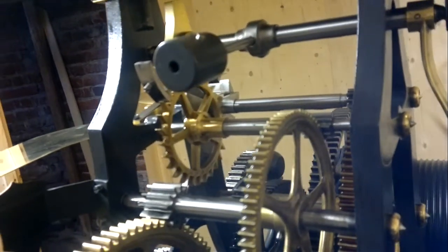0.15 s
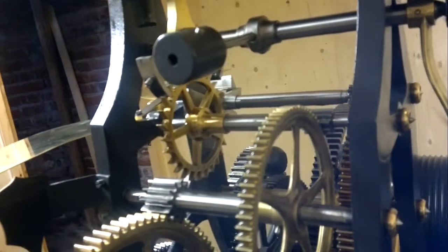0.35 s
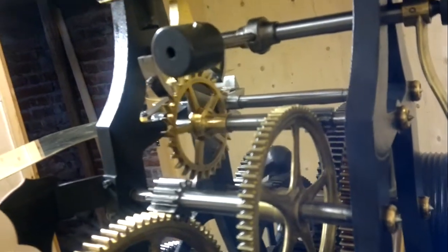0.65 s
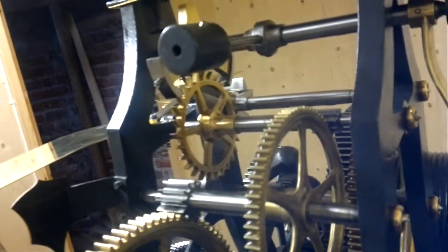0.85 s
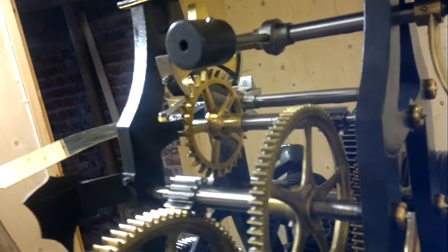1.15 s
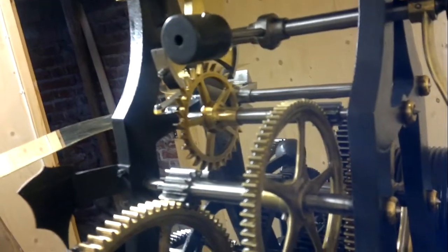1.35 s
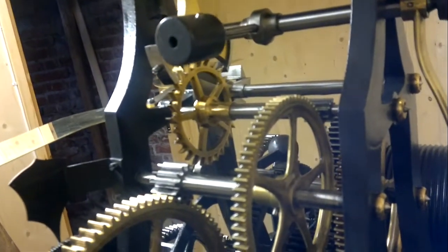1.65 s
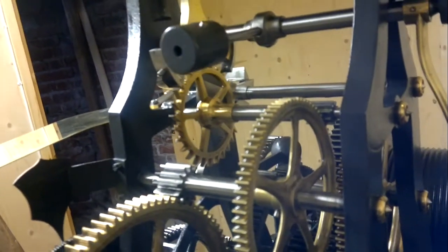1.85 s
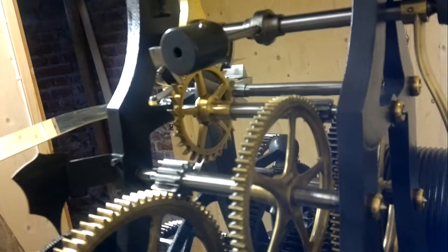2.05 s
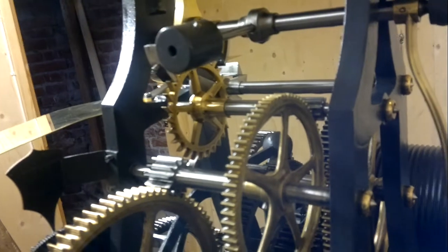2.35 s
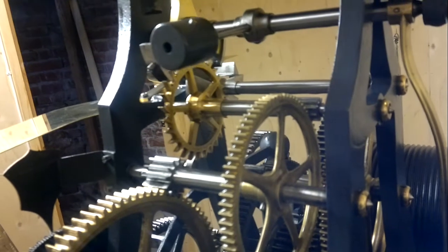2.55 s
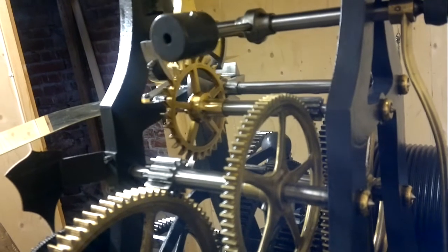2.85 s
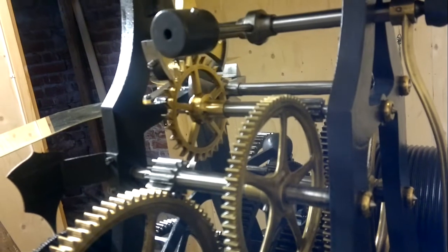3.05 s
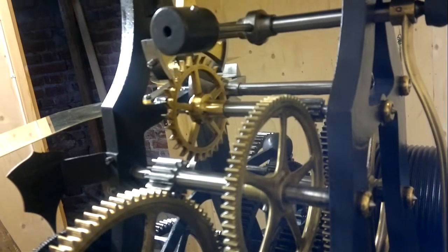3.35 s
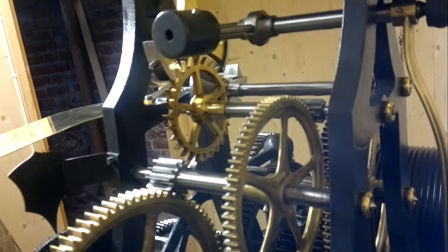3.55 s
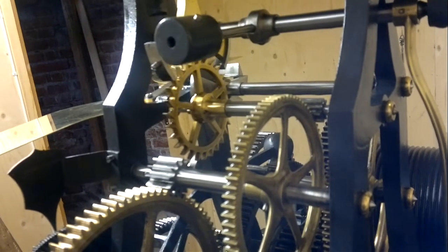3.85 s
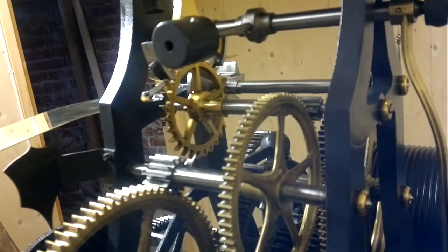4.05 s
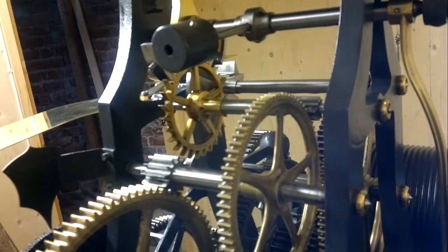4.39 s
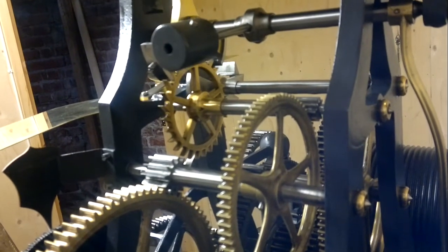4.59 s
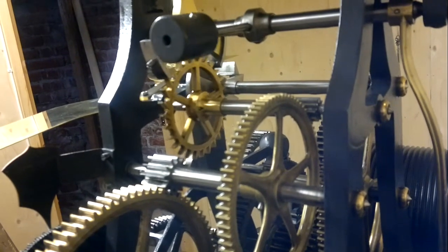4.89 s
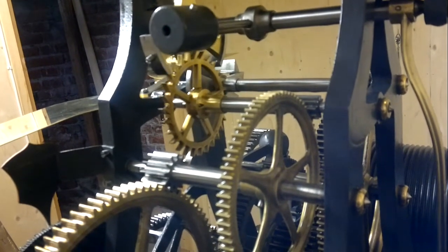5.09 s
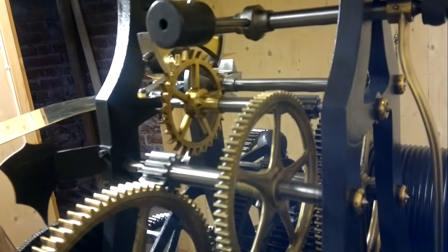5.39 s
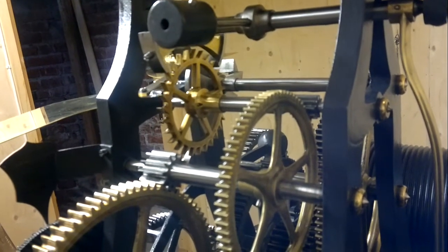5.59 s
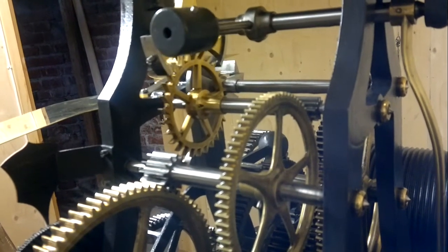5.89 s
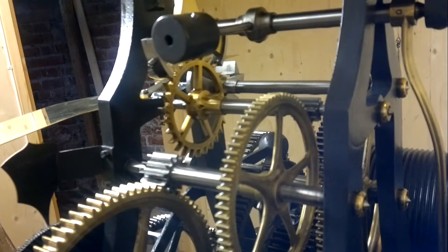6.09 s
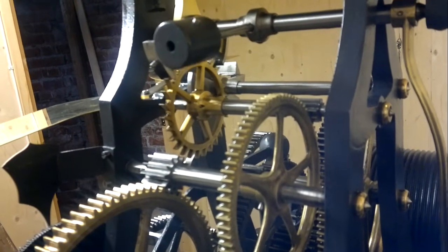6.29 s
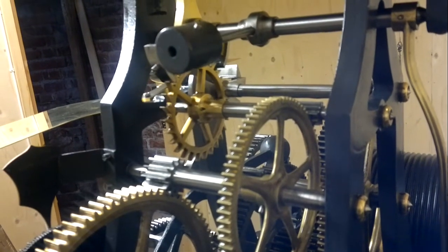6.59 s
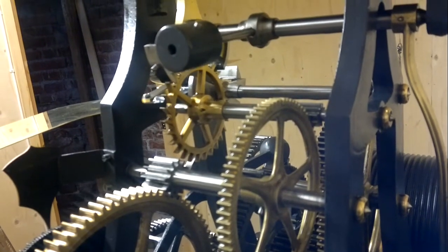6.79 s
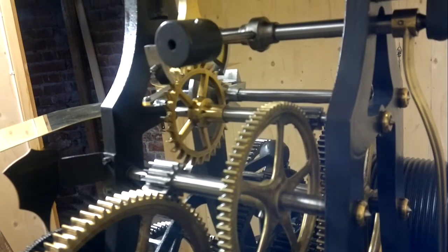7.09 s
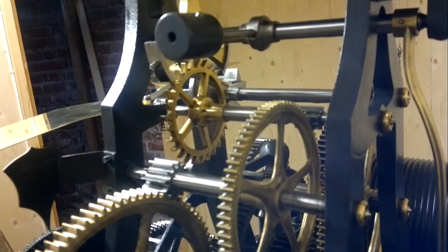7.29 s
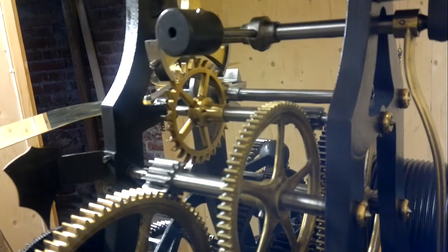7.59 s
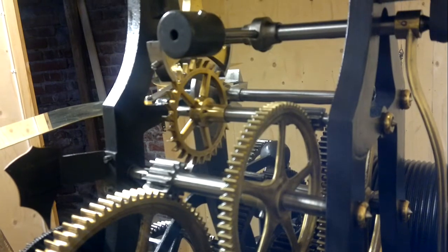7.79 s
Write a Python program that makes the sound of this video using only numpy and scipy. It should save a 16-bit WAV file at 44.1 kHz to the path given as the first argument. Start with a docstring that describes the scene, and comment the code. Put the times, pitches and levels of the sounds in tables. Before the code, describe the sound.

Slow, clanking metallic ticks from large clockwork alternate in a quiet wooden room, with barely audible road rumble and engine hum underneath.

```python
"""Slow, hard ticks of a tower clock movement in a quiet timber-lined room, close to a small stereo microphone.
Each beat: a light first touch, the escape wheel locking hard, then faint late echoes; two pallets alternate.
Ticks sum decaying frame modes and a noise-band clank, largely repeated from beat to beat.
Below: faint rustles and soft brief swells (noise puffs), engine hum (narrow noise bands) of a heavier
vehicle coming near, distant road rumble and microphone hiss (shaped noise)."""
import sys
import numpy as np
from scipy import signal
from scipy.fft import rfft, irfft
from scipy.io import wavfile
from scipy.ndimage import uniform_filter1d

SR = 44100
rng = np.random.default_rng(int(sys.argv[2]) if len(sys.argv) > 2 else 0)


def to_linear_factor(level_db):
    """Convert decibel levels (scalar or array-like) to linear amplitude factors."""
    exponent = np.asarray(level_db, float) / 20
    return 10 ** exponent


def waveform_to_disk(signal):
    """Save audio, clipped to [-1, 1], as 16-bit WAV at the path in sys.argv[1]."""
    frames = np.transpose(np.atleast_2d(signal))
    scaled = np.clip(frames, -1, 1) * 32767
    samples = np.round(scaled).astype(np.int16)
    wavfile.write(sys.argv[1], SR, samples)


N = 350137

# beats, pallets in turn: t/s, relative level/dB
BEATS = [(0.6365, -24), (1.893, -39.5), (2.779, -24.5), (4.0325, -38.5), (4.922, -24), (6.177, -39),
         (7.0655, -24.5)]
# brightness per pallet: tilt/(dB/octave), flattening below 1 kHz
PALLET_TILT_DB = (-1.43, -3.5)


def escapement():
    """Two pallets strike in turn, each with its own level and spectral tilt."""
    first = beats(0, count=4, ring_db=3.0, clank_db=23.0, alike=0.84)
    second = beats(1, count=3, ring_db=10.5, clank_db=29.0, alike=0.813)
    out = np.zeros((2, N))
    for k, (start_s, level_db) in enumerate(BEATS):
        pallet = k % 2
        sound = (first, second)[pallet][k // 2]
        size = sound.shape[1]
        hz = np.fft.rfftfreq(size, 1 / SR)
        tilt = to_linear_factor(PALLET_TILT_DB[pallet] * np.log2(1 + hz / 1000))
        add(out, start_s, to_linear_factor(level_db) * irfft(rfft(sound) * tilt, size))
    return out


# parts of a beat, one list per pallet: contacts within a beat, the last row a faint late echo
# delay/s, relative level/dB, tilt/(dB/octave), ring time/share, metallic-band lift/dB
BEAT_PARTS = [
    [(0, -11, 3, 0.78, -3.5), (.0150, -1, -0.1, 0.34, -1), (.0222, -1, -1, 0.92, 2),
     (.035, -15, 1.66, 1.05, -0.2), (.056, -16, 0, 0.77, 3)],
    [(0, -9.5, 6, 0.7, -6.5), (.0148, -1.2, 2.5, 0.91, 4), (.023, -7.5, -0.1, 0.86, 0),
     (.036, -15, 1, 0.84, 0), (.070, -17.5, -4, 0.6, -15)],
]


def beats(pallet, count, ring_db, clank_db, alike):
    """Parts overlap; modes repeat exactly, the clank mixes a kept share with a fresh one per beat."""
    t = np.arange(16384) / SR
    out = np.zeros((count, 2, 20000))
    hz, size, t60 = ring(pallet)
    for delay_s, level_db, tilt_db, share, metal_db in BEAT_PARTS[pallet]:
        # phase runs on from the beat start: each part feeds the running vibration
        swing = np.exp(2j * np.pi * hz * (t + delay_s))
        modes = to_linear_factor(colour_db(hz, tilt_db, metal_db)) * fade(t, share * t60, hz) * swing
        rung = to_linear_factor(ring_db) * (size * modes).imag.sum(1)
        kept = clank(pallet, tilt_db, metal_db, share, t)
        for beat in out:
            fresh = clank(pallet, tilt_db, metal_db, share, t)
            clanked = alike * kept + np.sqrt(1 - alike ** 2) * fresh
            add(beat, delay_s, to_linear_factor(level_db) * (rung + to_linear_factor(clank_db) * clanked))
    return out


# modes of wheels and iron frame: f/Hz
FRAME_HZ = [146, 234, 266, 290, 337, 381, 472, 583, 610, 657, 735, 760, 856, 878, 1040, 1058, 1270, 1450,
            1616, 1669, 1949, 2164, 2955, 3280, 3325, 3564, 4022, 4264, 4339, 5020, 5400]
# strength of each mode: relative level/dB from first pallet, relative level/dB from second
FRAME_DB = [(-16.5, -13), (-10.5, -17.5), (-10.5, -36), (-10, -9.5), (-12.5, -10), (-6, -4), (-13, -12),
            (-18.5, -8), (-10, -15), (-15.5, -6), (-8, -3), (-8.5, -3), (-14.5, -22), (-10.5, -6),
            (-9.5, -5), (-4.5, -31), (-19.5, -35), (-19.5, -15), (-17.5, -16.5), (-14.5, -10), (-24, -33),
            (-26.5, -21.5), (-26, -24), (-14.5, -16), (-11, -20), (-26.5, -18), (-18, -17.5), (-20.5, -25),
            (-20, -36), (-27.5, -40), (-23.5, -25)]
FRAME_RING_SHARE = 0.77  # of the clank's T60


def ring(pallet):
    """Frame modes pushed or pulled from rest; each reaches the right port with its own phase."""
    hz = np.c_[FRAME_HZ]
    level_db = np.transpose(FRAME_DB)[..., None][pallet]
    push, turn = rng.random((2, len(FRAME_HZ), 1))
    ports = paired(np.sign(push - 0.5), np.exp(2j * np.pi * turn), CLOCK_SAME, CLOCK_SIDE_DB, hz)
    return hz, to_linear_factor(level_db) * ports, FRAME_RING_SHARE * read(CLANK_T60_S, hz)


# dense clank of case, floor and room, one spectrum per pallet: f/Hz, relative level/(dB/Hz)
CLANK_DB = [
    [(25, -13.5), (70, -21.5), (140, -18), (195, -18), (240, -6.5), (450, -13.5), (860, -8.5),
     (1670, -19.5), (2540, -31), (3400, -24), (4400, -32), (5000, -32), (6800, -40), (8200, -51),
     (10500, -44), (13000, -54), (16000, -67)],
    [(25, -16), (70, -22.5), (150, -17), (190, -13), (250, -1), (616, -2.5), (960, -4.5), (1630, -15),
     (2350, -24), (4080, -30), (4700, -37), (5500, -36.5), (6400, -49.5), (7500, -51.5), (10800, -53),
     (13000, -63), (16000, -72)],
]
# clank decay at ring share 1: f/Hz, T60/s
CLANK_T60_S = [(40, 0.25), (100, 0.26), (250, 0.28), (700, 0.41), (1400, 0.37), (2200, 0.25), (2900, 0.14),
               (5000, 0.13), (8000, 0.098), (13000, 0.17)]
# left-right likeness of the clock: f/Hz, correlation/1
CLOCK_SAME = [(60, 0.86), (110, 1), (200, 0.92), (380, 0.92), (700, 0.96), (1290, 0.6), (2380, -0.22),
              (4400, 0.07), (8120, 0.05), (15000, 0.01)]
# stereo lean of the clock: f/Hz, left over right/dB
CLOCK_SIDE_DB = [(60, -5), (110, -5.5), (200, -5), (380, -6), (700, -5.5), (1290, -5.5), (2380, -6.5),
                 (4400, -5), (8120, 0), (15000, 0.5)]


def clank(pallet, tilt_db, metal_db, share, t):
    """Countless small resonances: half-octave-spaced noise bands, each swelling and dying at its own speed."""
    hz, z = stereo_noise(len(t), CLOCK_SAME, CLOCK_SIDE_DB)
    z = z * to_linear_factor(read(CLANK_DB[pallet], hz) + colour_db(np.maximum(hz, 250), tilt_db, metal_db))
    out = np.zeros((2, len(t)))
    for centre_hz in 21 * 2 ** np.arange(0, 10.5, 0.5):
        octaves = np.log2(hz / centre_hz + 1e-9)
        band = np.cos(np.pi / 2 * np.clip(2 * octaves, -1, 1)) ** 2
        t60 = read(CLANK_T60_S, centre_hz)
        out += irfft(z * band, len(t)) * fade(t, share * t60, centre_hz) / np.sqrt(t60)
    return out


# onset time constant: f/Hz, rise/s
RISE_S = [(40, .04), (120, 0.016), (300, 0.0083), (1000, .001), (5000, .0006)]
# louder first instant: f/Hz, extra amplitude/share
CRACK_SHARE = [(500, 0.85), (2000, 0.53), (6000, 1.1), (12000, 3.4)]
CRACK_S = 0.0058
# decay exponent: f/Hz, bend/1 (above 1 holds first, then drops)
FADE_BEND = [(300, 0.98), (1000, 0.8), (2200, 1.42), (4000, 1.68), (12000, 1.2)]


def fade(t, t60, hz):
    """Swells in with a crack, then dies; where bent above 1 it holds while the train still shakes."""
    swell = 1 - np.exp(-t / read(RISE_S, hz))
    crack = 1 + read(CRACK_SHARE, hz) * np.exp(-t / CRACK_S)
    return swell * crack * to_linear_factor(-60 * (t / t60) ** read(FADE_BEND, hz))


METAL_HZ, METAL_OCTAVES = 3700, 0.5  # centre, 1/e half-width of the dB lift


def colour_db(hz, tilt_db, metal_db):
    """Colour of one part of a beat: tilt about 1 kHz plus a lift around the wheels' metallic band."""
    metal = np.exp(-(np.log2(hz / METAL_HZ) / METAL_OCTAVES) ** 2)
    return tilt_db * np.log2(hz / 1000) + metal_db * metal


# faint rustles and soft puffs; the left-leaning one at 3.08 s is probably the clock rebounding;
# those with top f near 1 kHz are soft brief swells, perhaps traffic murmurs:
# t/s, level/dB, length/s, tilt/(dB/octave), top f/Hz, left over right/dB
SOFT_SOUNDS = [(2.397, -60, 0.031, -4.5, 6740, -8.5), (2.391, -61.5, 0.07, 5, 1050, -2),
               (3.036, -69, 0.023, -1, 6840, -5), (3.076, -57, 0.085, -3, 1230, -9),
               (3.351, -64.5, 0.075, 3, 1000, 0.5), (4.336, -71.5, 0.033, 4.5, 13060, 10),
               (4.514, -66.5, 0.064, 6, 990, 0.5), (7.748, -65.5, 0.051, 3, 1050, 0)]


def soft_sounds():
    """Faint rustles, puffs and brief swells: noise rolled off above a top frequency, Gaussian envelopes."""
    out = np.zeros((2, N))
    t = (np.arange(8192) - 4096) / SR
    for centre_s, level_db, length_s, tilt_db, top_hz, side_db in SOFT_SOUNDS:
        hz, z = stereo_noise(8192, AIR_SAME, AIR_SIDE_DB)
        colour = to_linear_factor(tilt_db * np.log2(hz / 1000 + 0.25)) / (1 + (hz / top_hz) ** 4)
        sound = evened(irfft(z * colour)) * np.exp(-2 * (t / length_s) ** 2)
        ports_db = [[level_db + side_db / 2], [level_db - side_db / 2]]
        add(out, centre_s - 4096 / SR, to_linear_factor(ports_db) * sound)
    return out


# wavering hum of the heavier vehicle: f/Hz, width/Hz, rms level when near/dB
ENGINE = [(27, 5, -67.5), (77.5, 6, -71.5)]


def engine():
    """Engine hum: narrow noise bands waver by themselves, the same in both ports."""
    hz = np.fft.rfftfreq(N, 1 / SR)
    hum = np.zeros(N)
    for f, width_hz, level_db in ENGINE:
        z = rfft(rng.standard_normal(N))
        band = 1 / (1 + (2 * (hz - f) / width_hz) ** 2)
        hum += to_linear_factor(level_db) * evened(irfft(z * band, N))
    return hum * nearness(np.arange(N) / SR)


TRAFFIC_IN_S, TRAFFIC_OUT_S, TRAFFIC_FADE_S = 2.7, 9.1, 0.25  # out lies past the end: it stays near


def nearness(t):
    """Heavier vehicle: 0 while away, 1 while near, tanh transitions."""
    come = np.tanh((t - TRAFFIC_IN_S) / TRAFFIC_FADE_S)
    leave = np.tanh((t - TRAFFIC_OUT_S) / TRAFFIC_FADE_S)
    return (come - leave) / 2


# rumble and hiss spectrum: f/Hz, relative level/(dB/Hz)
AIR_SPECTRUM_DB = [(12, -28), (20, 0), (53, -6.5), (81, -0.5), (104, -6.5), (134, -6.5), (154, -9.5),
                   (241, -12), (277, -11.5), (574, -17), (949, -12.5), (1760, -27.5), (3340, -34.5),
                   (14700, -42.5), (16000, -50)]
AIR_RMS_DB = -59.5
# left-right likeness of the background: f/Hz, correlation/1
AIR_SAME = [(60, 0.52), (180, 0.87), (550, 0.844), (1650, 0.13), (4970, -0.04), (15000, -0.02)]
# stereo lean of the background: f/Hz, left over right/dB
AIR_SIDE_DB = [(60, 2.5), (180, 0.5), (550, 1), (1650, -3.5), (4970, -0.5), (15000, -2)]
# fuzzy notes in the rumble: f/Hz, width/Hz, lift/dB
DRONES = [(77.5, 10, 4), (132, 17, 4)]
TRAFFIC_BASS_DB = 2  # rumble lift from the heavier vehicle
PATCH_DB, TYRE_WAVER_DB = 1.5, 1.2  # random outdoor patches; slow wavering of tyre hiss


def air():
    """Far traffic and microphone hiss: steady on top, patchy and swelling in the bass."""
    frames = N // 512 + 5
    hz = np.fft.rfftfreq(2048, 1 / SR)[:, None]
    a, b, c, d, patches = rng.standard_normal((frames, 1025, 5)).T
    patches = uniform_filter1d(patches, size=4, axis=0)
    patches = evened(uniform_filter1d(patches, size=10, axis=1))
    waver = uniform_filter1d(rng.standard_normal(frames), size=14)
    waver = evened(uniform_filter1d(waver, size=14))
    frame_s = (np.arange(frames) * 512 - 1024) / SR
    tyres = np.exp(-(np.log2(hz / 900 + 1e-3) / 0.41) ** 2)
    outdoor = 1 / (1 + (hz / 1800) ** 2)
    bass = 1 / (1 + (hz / 170) ** 2)
    level_db = read(AIR_SPECTRUM_DB, hz)
    level_db = level_db + sum(lift_db / (1 + (2 * (hz - f) / width_hz) ** 2) for f, width_hz, lift_db in DRONES)
    level_db = level_db + PATCH_DB * outdoor * patches
    level_db = level_db + TRAFFIC_BASS_DB * bass * nearness(frame_s)
    level_db = level_db + TYRE_WAVER_DB * tyres * waver
    z = paired(a + 1j * b, c + 1j * d, AIR_SAME, AIR_SIDE_DB, hz) * to_linear_factor(level_db)
    noise = signal.istft(z, nperseg=2048, noverlap=1536)[1][:, :N]
    return to_linear_factor(AIR_RMS_DB) * evened(noise)


def stereo_noise(size, same, side_db):
    """Spectrum of white noise as the two ports hear it."""
    hz = np.fft.rfftfreq(size, 1 / SR)
    a, b = rfft(rng.standard_normal((2, size)))
    return hz, paired(a, b, same, side_db, hz)


def paired(a, b, same, side_db, hz):
    """Two microphone ports: partly alike, tipped to one side."""
    c = np.clip(read(same, hz), -1, 1)
    lean = to_linear_factor(read(side_db, hz) / 2)
    return np.array([a * lean, (c * a + np.sqrt(1 - c ** 2) * b) / lean])


def evened(x):
    """Scales to rms 1."""
    return x / np.sqrt(np.mean(x ** 2) + 1e-20)


def read(points, hz):
    """Interpolates a table on a log-frequency axis."""
    f, value = np.transpose(points)
    return np.interp(np.log(hz + 1), np.log(f + 1), value)


def add(mix, start_s, sound):
    """Mixes a stereo sound in at start_s, cut at the end of the mix."""
    part = mix[:, round(start_s * SR):][:, :sound.shape[1]]
    part += sound[:, :part.shape[1]]


def scene():
    """Clock, soft sounds, vehicle and background."""
    return escapement() + soft_sounds() + engine() + air()


def top_cut(x):
    """Nothing passes above the cut-off."""
    return signal.sosfilt(signal.butter(12, 16450, fs=SR, output="sos"), x)


def record(dry):
    """Microphone low cut: fourth-order high-pass at 17 Hz."""
    low_cut = signal.butter(4, 17, "high", fs=SR, output="sos")
    mix = signal.sosfilt(low_cut, dry)
    return top_cut(mix)


dry = scene()
out = record(dry)
waveform_to_disk(out)
```